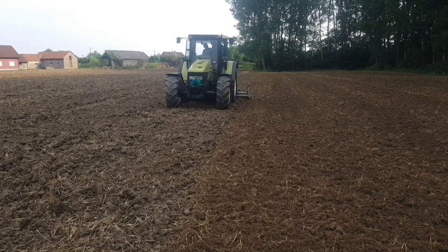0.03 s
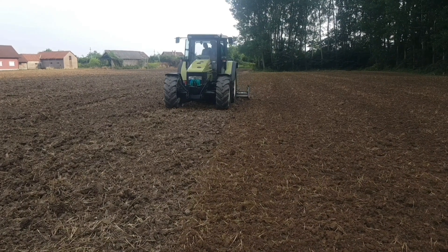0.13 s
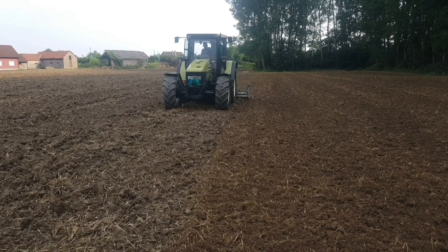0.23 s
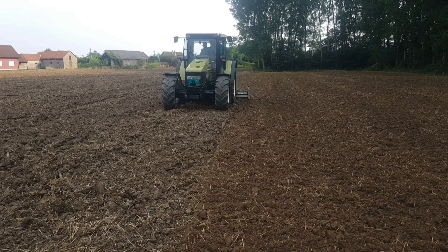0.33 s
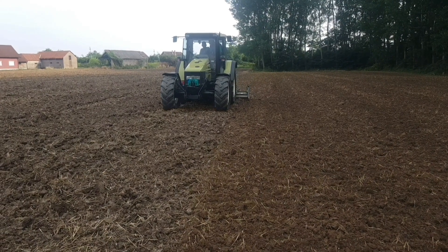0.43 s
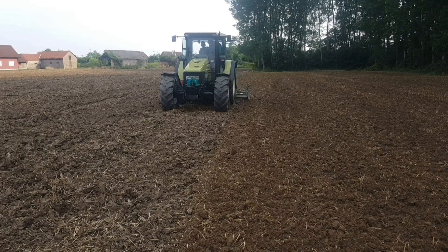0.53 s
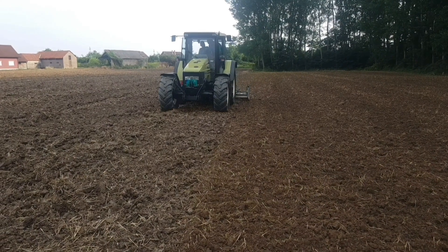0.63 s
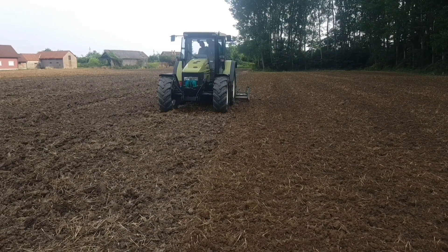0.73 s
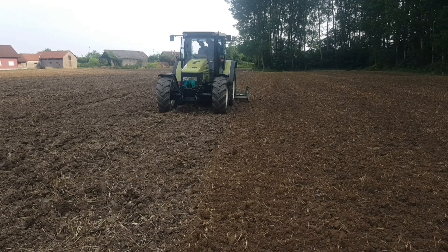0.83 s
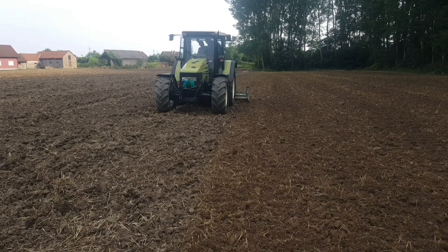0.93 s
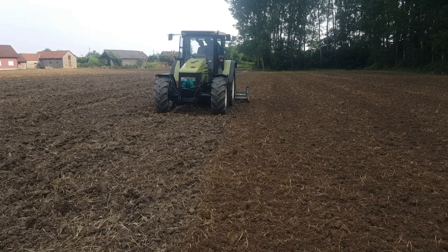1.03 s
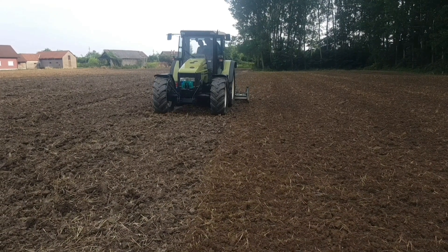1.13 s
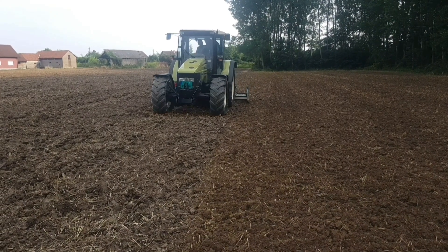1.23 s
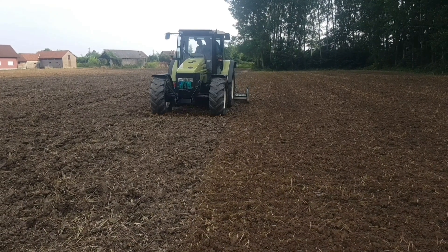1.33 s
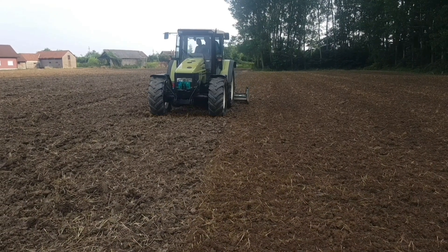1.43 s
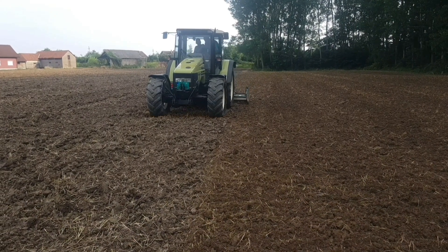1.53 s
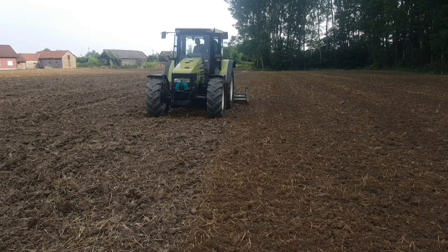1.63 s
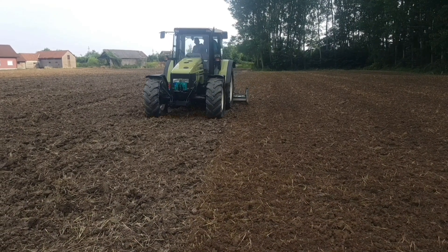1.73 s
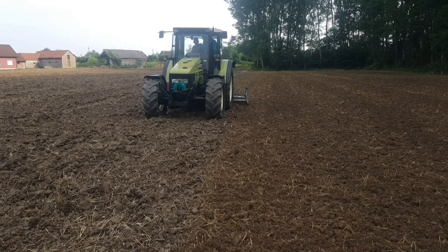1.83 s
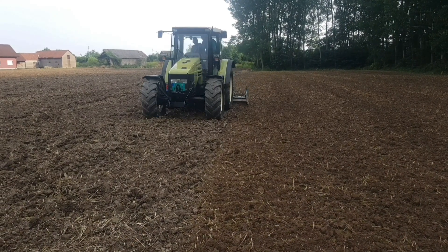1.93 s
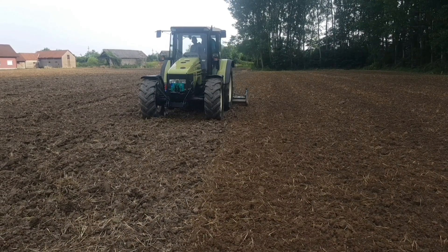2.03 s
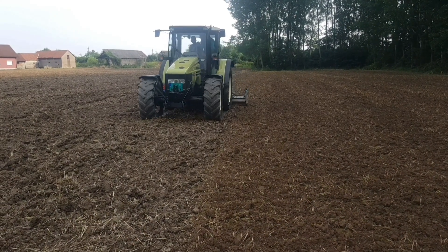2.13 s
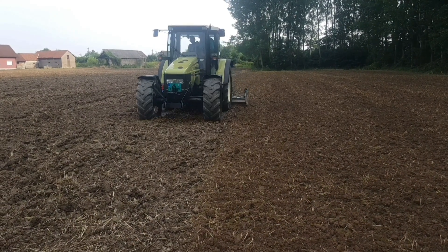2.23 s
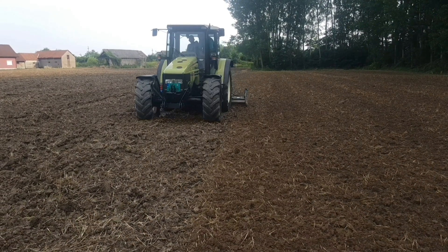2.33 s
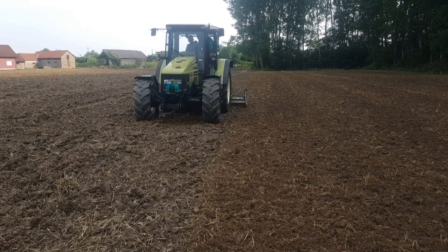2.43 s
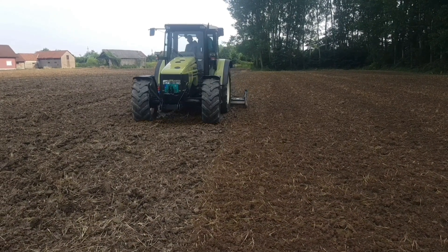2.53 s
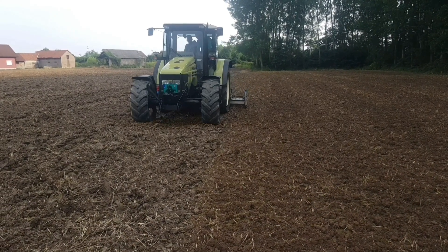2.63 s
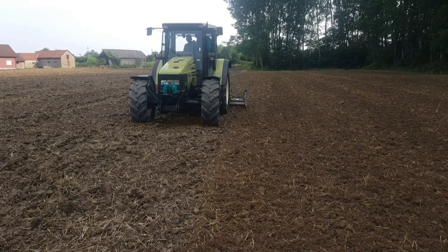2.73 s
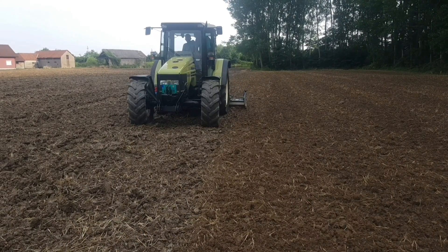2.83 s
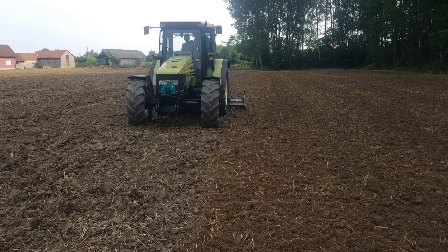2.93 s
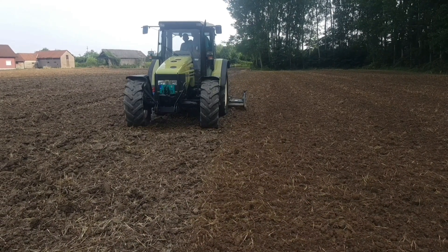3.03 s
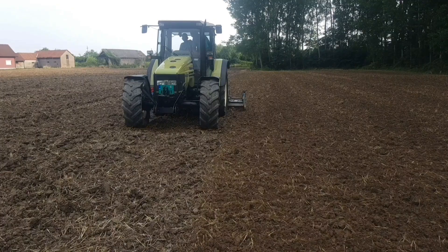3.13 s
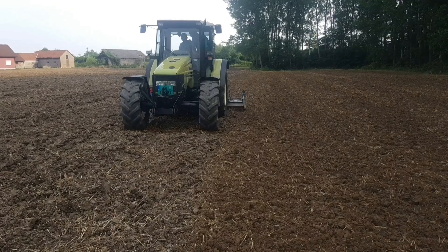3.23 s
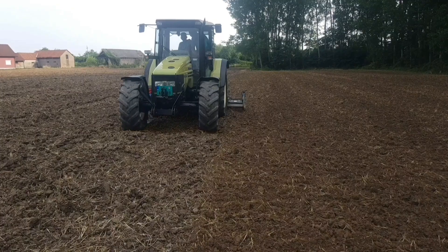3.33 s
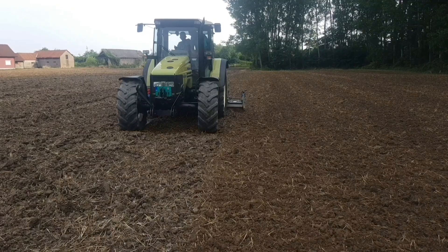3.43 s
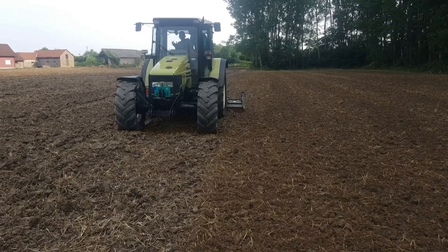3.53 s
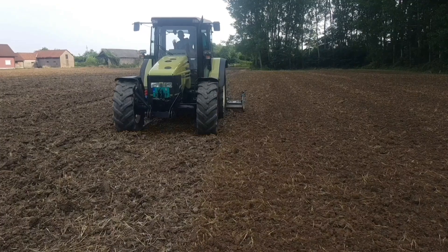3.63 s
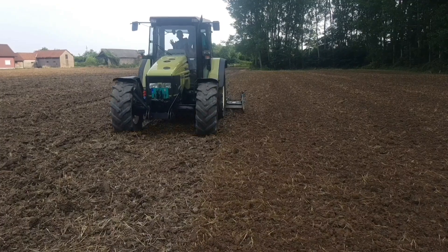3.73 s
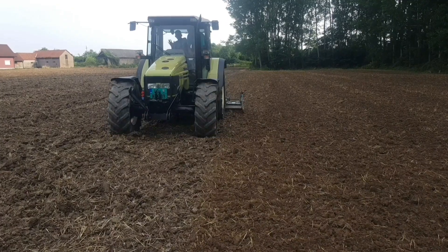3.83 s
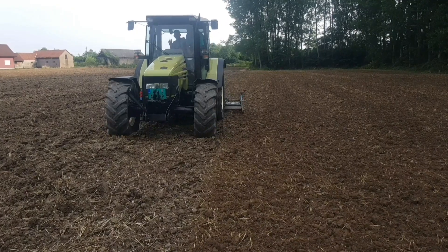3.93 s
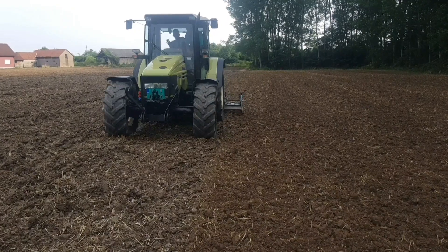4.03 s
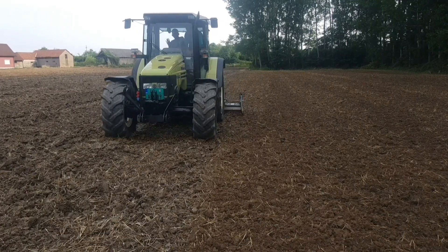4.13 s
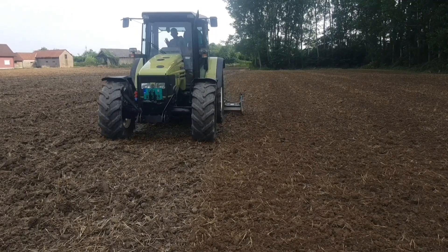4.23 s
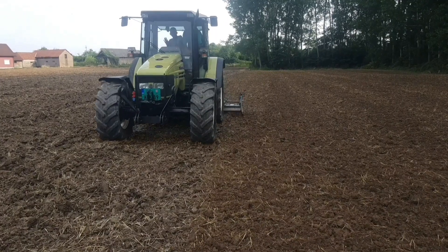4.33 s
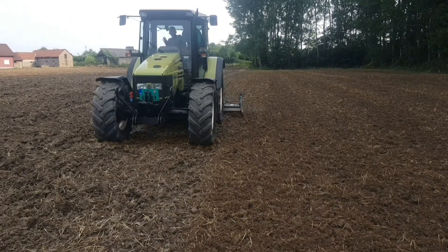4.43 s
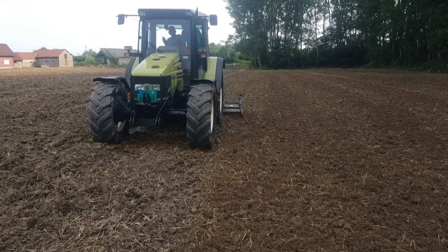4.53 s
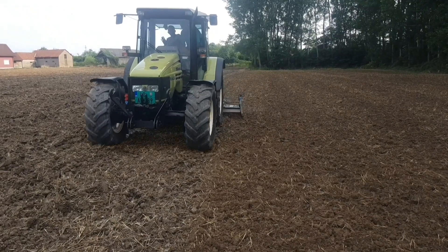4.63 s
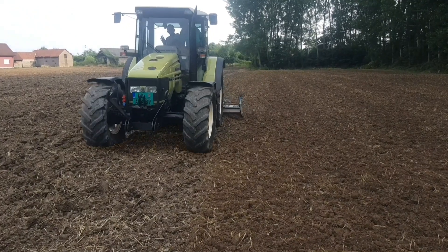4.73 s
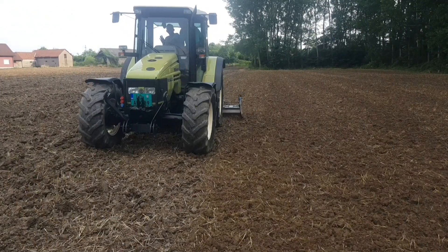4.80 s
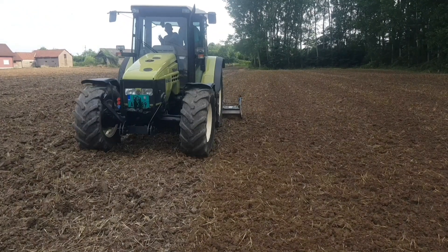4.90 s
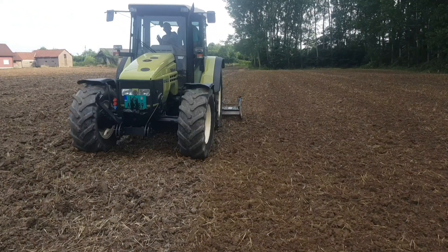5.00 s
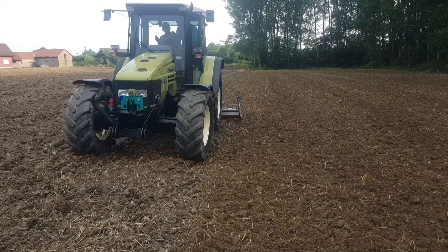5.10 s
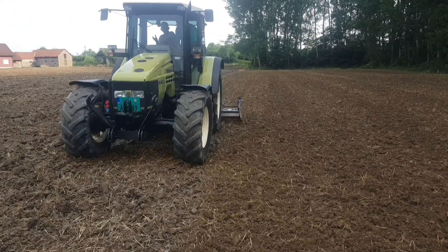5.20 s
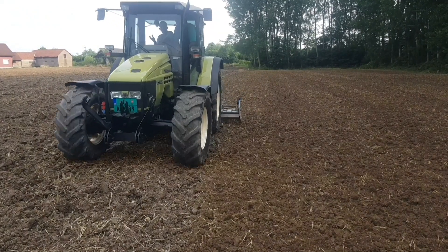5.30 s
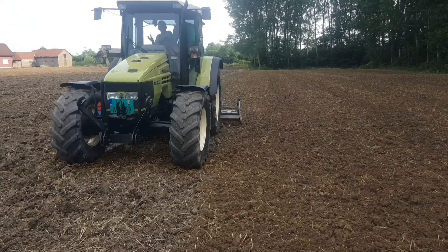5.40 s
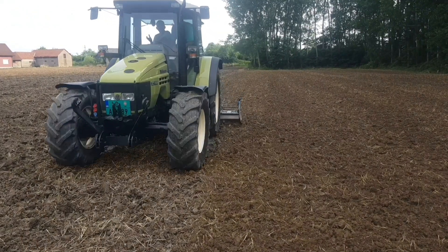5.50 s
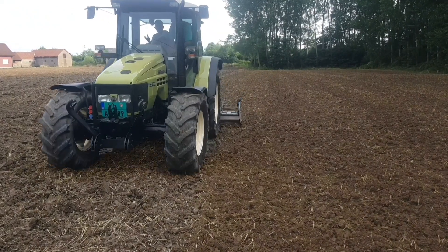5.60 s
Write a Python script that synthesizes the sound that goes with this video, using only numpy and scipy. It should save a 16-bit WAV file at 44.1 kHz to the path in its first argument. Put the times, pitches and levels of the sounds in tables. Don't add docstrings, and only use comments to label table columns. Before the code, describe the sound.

Outdoors in an open field, a diesel tractor works under steady load, already running at the start. Fast low exhaust thumps, metallic knocking and a steady mid-pitched fan whine blend with low roar, tine rattle and airy hiss from the harrow. It gradually comes nearer and brighter, turning throatier in the last half second. Handheld stereo microphone, weighted to the right, dry with a faint close reflection.

```python
import sys
import numpy as np
from scipy import signal
from scipy.io import wavfile
from scipy.ndimage import uniform_filter1d

SR = 44100
rng = np.random.default_rng(int(sys.argv[2]) if len(sys.argv) > 2 else 0)


def ratio(d):
    e = np.asarray(d, float) / 20
    return 10 ** e


def dump(signal):
    limited = np.clip(np.atleast_2d(signal).T, -1, 1)
    pcm = np.round(limited * 32767).astype(np.int16)
    wavfile.write(sys.argv[1], SR, pcm)


N = 249606
TIME = np.arange(N) / SR

# (t/s, f/Hz)
FAN_SPEED = [(0.0, 521.3), (0.06, 514.7), (0.38, 524.2), (1.09, 520.0), (1.54, 530), (2.03, 520.9),
             (2.73, 516.3), (3.15, 519.3), (3.36, 512.7), (3.64, 512.5), (3.89, 526.8), (4.07, 527.2),
             (4.4, 519), (4.63, 517), (4.95, 533.1), (5.19, 534), (5.56, 522.4), (5.66, 512)]
BLADE_ORDER, BLADES = 31.78, 6
# (t/s, swing [0-1])
APPROACH = [
    (0, 0.04),
    (1, 0.18),
    (2, 0.36),
    (4, 0.88),
    (5.66, 0.93),
]
# (f/Hz, density/dB per Hz)
BLOCK_SPECTRUM = [(600, -32), (800, -7), (885, -4), (1030, -2), (1300, -4), (1570, -6.5), (1770, -6.5),
                  (2300, -5.5), (2860, -10.5), (3200, -17), (4000, -24), (5200, -49)]
CYLINDER_DB = [
    -0.56,
    0.31,
    0.19,
    0.73,
]


def evened(x):
    return x / np.sqrt(np.mean(x ** 2) + 1e-20)


def read(points, hz, axis=1):
    table = np.transpose(points)
    return np.interp(np.log(hz + 1), np.log(table[0] + 1), table[axis])


def curve(rows, axis=1, t=TIME):
    table = np.transpose(rows)
    return np.interp(t, table[0], table[axis])


def drift(hz):
    steps = rng.standard_normal(int(N / SR * hz * 4) + 8)
    smooth = evened(uniform_filter1d(uniform_filter1d(steps, size=2), size=2))
    return np.interp(TIME * hz * 4, np.arange(len(smooth)), smooth)


def noise(spectrum, patchy_db, band_db, size=N):
    frames, hz = size // 256 + 5, np.fft.rfftfreq(1024, 1 / SR)
    real, imag, patches, bands = rng.standard_normal((frames, 513, 4), dtype=np.float32).T
    patches = uniform_filter1d(patches, size=10, axis=0)
    patches = evened(uniform_filter1d(patches, size=12, axis=1))
    bands = uniform_filter1d(bands, size=6, axis=0)
    bands = evened(uniform_filter1d(bands, size=220, axis=1))
    level_db = read(spectrum, hz)[:, None] + patchy_db * patches + band_db * bands
    z = (real + 1j * imag) * ratio(level_db)
    return evened(signal.istft(z, nperseg=1024, noverlap=768)[1][:size])


def tone(cycles, order, db, wobble, start=None):
    if start is None:
        start = 2 * np.pi * rng.random()
    shake = drift(5.5)
    level = np.sqrt(2) * ratio(db + 2.7 * wobble * shake[::-1])
    return level * np.cos(2 * np.pi * order * cycles + start + wobble * shake)


def nearer_db(share):
    start_m, speed_m_per_s = 21.3, 1.88
    return share * 20 * np.log10(start_m / (start_m - speed_m_per_s * TIME))


def firing_gate(cycles, depth_db, late, cycle_db):
    firing = 4 * cycles - late
    bump = np.exp(1.4 * (np.cos(2 * np.pi * firing) - 1))
    strength = np.take(CYLINDER_DB, (firing + .5).astype(int) % 4)
    return ratio((depth_db + strength) * bump + cycle_db * np.cos(2 * np.pi * (cycles - .5)))


def hiss(cycles):
    # (f/Hz, density/dB per Hz)
    hiss_spectrum = [(4470, -37), (7600, -19.5), (8150, -11), (9000, -1.5), (11100, 2.5), (14100, -3.5),
                     (15200, -4)]
    air = evened(noise(hiss_spectrum, 1.4, .9) * firing_gate(cycles, .7, .35, .3))
    return air * ratio(-53.5 + nearer_db(0.82))


def rattle(cycles):
    # (f/Hz, density/dB per Hz)
    rattle_spectrum = [(2500, -26), (3300, -1.5), (3800, -3.5), (4800, -2.5), (5800, -1), (7000, -11),
                       (8200, -18), (9500, -40)]
    tines = evened(noise(rattle_spectrum, 0.76, 0.78) * firing_gate(cycles, .4, .3, 0.88))
    return tines * ratio(-50 + nearer_db(0.72))


def roar(cycles):
    # (f/Hz, density/dB per Hz)
    roar_spectrum = [(20, -24), (45, -6.5), (100, -1.5), (200, -7.5), (240, -10), (330, -9.5), (400, -7),
                     (470, -4.5), (590, -1.5), (700, -1.5), (790, -11.5), (880, -13), (1200, -39),
                     (2000, -51)]
    level = ratio(-33 + 2.15 * curve(APPROACH))
    return noise(roar_spectrum, 0.82, 0.52) * level * firing_gate(cycles, 0.68, 0.35, .1)


def knocks(cycles):
    t, out = np.arange(2048) / SR, np.zeros(N)
    envelope = ratio(-60 * t / 0.042) * (1 - np.exp(-t / 0.00051))
    ring = noise(BLOCK_SPECTRUM, .1, .1, size=4 * 2048).reshape(4, -1) * envelope
    firing = 4 * cycles - .25
    at = np.flatnonzero(np.diff(np.floor(firing)))
    blow = ratio(1.5 * rng.standard_normal(len(at)))
    for k in range(4):
        train = np.zeros(N)
        mine = np.floor(firing[at + 1]) % 4 == k
        train[at[mine]] = blow[mine] * ratio(CYLINDER_DB[k])
        out += signal.oaconvolve(train, ring[k])[:N]
    return evened(out)


def clatter(cycles):
    loose = evened(noise(BLOCK_SPECTRUM, 0.94, 0.99) * firing_gate(cycles, 0.99, 0.38, 0.11))
    return (0.95 * loose + 0.37 * knocks(cycles)) * ratio(-36.5 + nearer_db(.85))


def turbulence(cycles):
    return roar(cycles) + clatter(cycles) + rattle(cycles) + hiss(cycles)


def panel(hz, width, db):
    r = np.exp(-np.pi * width / SR)
    resonator = [1, -2 * r * np.cos(2 * np.pi * hz / SR), r * r]
    shaking = signal.lfilter([1], resonator, rng.standard_normal(N))
    return ratio(db + 2.6 * curve(APPROACH)) * evened(shaking)


def panels():
    # (f/Hz, width/Hz, level/dB)
    panel_modes = [
        (1457, 25, -51.5),
        (1763, 28, -49.5),
        (10390, 15, -76),
    ]
    return sum(panel(*row) for row in panel_modes)


def gears(cycles):
    # (order of the cycle, level/dB, wobble/rad)
    harrow = [
        (2.87, -44.5, .25),
        (5.7, -46.5, .35),
        (35.8, -46.5, .7),
    ]
    # (order of the cycle, level/dB, wobble/rad, start/rad if set)
    further_lines = [
        (3, -54, .1, .2),
        (6, -52, .1, 1.9),
        (52, -58, .4),
        (56, -57, .4),
        (59, -52.5, .4),
        (61, -52.5, .4),
    ]
    return sum(tone(cycles, *row) for row in harrow + further_lines)


def shroud(cycles):
    shroud_hz, width_hz = 1773, 22
    off = (curve(FAN_SPEED) * 20 / BLADES - shroud_hz) / width_hz
    db = -47.5 + nearer_db(.8) - 20 * np.log10(1 + off ** 2)
    return tone(cycles, 20 * BLADE_ORDER / BLADES, db, 0.48)


def fan(cycles):
    # (multiple of the fan shaft, level below the blade tone/dB)
    fan_shaft = [(1, -20), (2, -23), (3, -13), (5, -20), (6, 0), (8, -16), (9, -24), (12, -21), (13, -24),
                 (14, -22), (15, -28), (16, -28), (20, -21)]
    rated_hz, load_db_per_hz, flutter_db = 517.7, 0.12, .8
    whine = sum(tone(cycles, k * BLADE_ORDER / BLADES, db, 0.052 + 0.014 * k) for k, db in fan_shaft)
    level_db = -32 + load_db_per_hz * (rated_hz - curve(FAN_SPEED)) + flutter_db * drift(2.5)
    return ratio(level_db) * whine


def exhaust(cycles):
    # (t/s, firing thump/dB)
    thump = [(0.0, -26), (0.05, -27), (1.39, -27.5), (1.58, -30.5), (1.69, -27.5), (1.78, -31), (1.84, -28),
             (3.58, -26), (4.29, -26.5), (4.65, -25.5), (5.31, -29), (5.45, -25), (5.64, -28), (5.66, -25)]
    # (order of the cycle, far level/dB, near level/dB)
    exhaust_orders = [(5, -53, -52), (7, -45, -45), (8, -32, -32), (9, -52, -54), (10, -50, -49),
                      (11, -56, -49), (12, -44, -39), (13, -60, -50), (14, -67, -65), (15, -53, -48),
                      (16, -45, -41), (17, -42, -40), (18, -56, -53), (19, -59, -46), (20, -57, -53),
                      (21, -50, -46), (22, -67, -58), (23, -50, -50), (24, -54, -55)]
    uneven = {5: 2.6, 7: 2.1, 9: -1.5, 17: 1.9}
    # (order of the cycle, far level/dB)
    bark = [(25, -63), (28.5, -47), (31, -56), (36, -45.5), (39, -52.5), (45, -52.5), (47, -60), (49, -56)]
    bark_at = .83
    near = curve(APPROACH)
    throaty_db = -1.2 + 8.5 * np.exp((TIME - TIME[-1]) / 0.42)
    out = np.sqrt(2) * ratio(curve(thump) + 0.8) * np.cos(2 * np.pi * 4 * cycles)
    for order, far_db, near_db in exhaust_orders:
        db = far_db + (near_db - far_db) * (1.76 * near - .45) + .5
        db = db + throaty_db * np.exp(-((order - 13.5) / 3.7) ** 2)
        db = db + 1.2 * np.clip(order / 12 - .6, 0, 1) * drift(1.31)
        start = (order / 4 - 1) ** 2.2 if order % 4 == 0 else uneven.get(order)
        out += tone(cycles, order, db, 0.0053 * order, start=start)
    for order in range(25, 50):
        db = curve(bark, t=order) + 2 * 1.35 * near + 2.5 * rng.standard_normal()
        start = -2 * np.pi * order * bark_at + 2 + .7 * rng.standard_normal()
        out += tone(cycles, order, db, 0.0067 * order, start=start)
    return out


def ports(direct, scattered):
    # (f/Hz, likeness of the ports [0-1], share of the lead, strength of the echo off the holder's body)
    port_response = [(60, 0.91, .3, 0.011), (520, 1, .4, 0.038), (804, 0.98, .55, 0.2),
                     (1180, 0.65, 0.51, 0.088), (2040, 0.95, 0.9, 0.14), (3350, 0.5, 0.62, 0.21),
                     (5400, .35, .98, 0.14), (9000, 0.02, 0.85, 0.11), (15000, 0.24, 0.64, .05)]
    # (f/Hz, left minus right/dB)
    balance = [(60, -5.5), (99, -5.5), (160, -4), (270, -5), (440, -4), (730, -5.5), (1210, -5.5),
               (2000, -4.5), (3290, -7.5), (5430, -9.5), (8960, 2), (14800, -4)]
    hz, t, z = signal.stft([direct, scattered], SR, nperseg=1024, noverlap=768)
    same = np.clip(read(port_response, hz), 0, 1)[:, None]
    swing = curve(APPROACH, t=t)
    lead = 1.2 + 3.8 * swing
    early = np.exp(2j * np.pi * np.outer(hz * read(port_response, hz, axis=2), lead) / SR)
    left = same * early * z[0] + np.sqrt(1 - same ** 2) * z[1]
    echo_ms = 1.762 + 0.43 * (t / t[-1] - .5) ** 2
    split_ms = (0.046 + .25 * swing) / 2
    strength = (1 + 0.56 * (1 - swing)) * read(port_response, hz, axis=3)[:, None]

    def with_echo(delay_ms, share):
        return 1 + share * strength * np.exp(-2j * np.pi * np.outer(hz, delay_ms) / 1000)

    tilt_db = read(balance, hz)[:, None]
    pair = [left * with_echo(echo_ms + split_ms, 1.4) * ratio(0.71 * tilt_db),
            z[0] * with_echo(echo_ms - split_ms, 1.05) * ratio(-.38 * tilt_db)]
    return signal.istft(pair, SR, nperseg=1024, noverlap=768)[1][:, :N]


def scene():
    cycles = np.cumsum(curve(FAN_SPEED) / BLADE_ORDER) / SR + .99
    machinery = panels() + gears(cycles) + shroud(cycles) + fan(cycles)
    direct = turbulence(cycles) + machinery + exhaust(cycles)
    return ports(direct, turbulence(cycles))


def top_cut(x):
    return signal.sosfilt(signal.butter(12, 15390, fs=SR, output="sos"), x)


def record(dry):
    return top_cut(dry)


dry = scene()
out = record(dry)
dump(out)
```